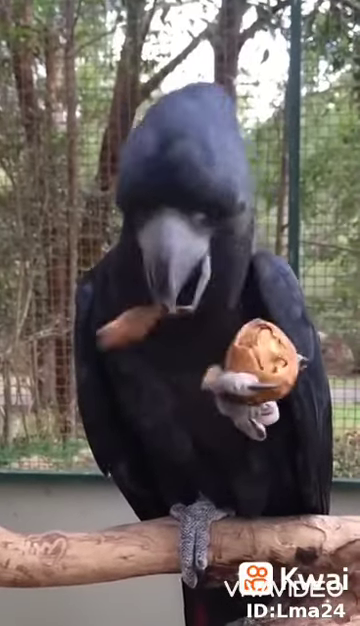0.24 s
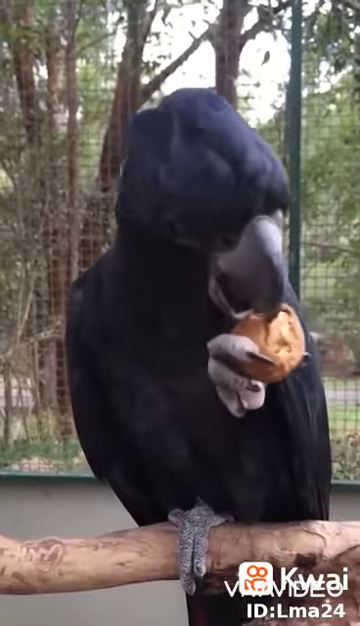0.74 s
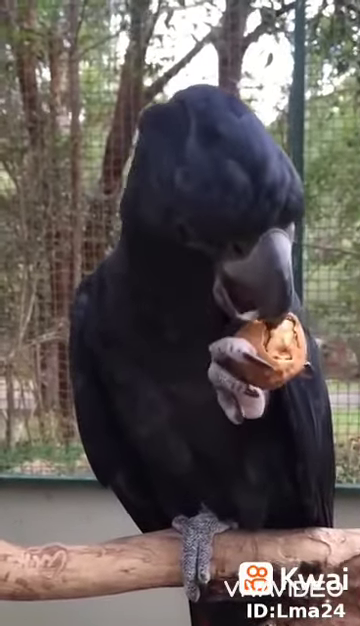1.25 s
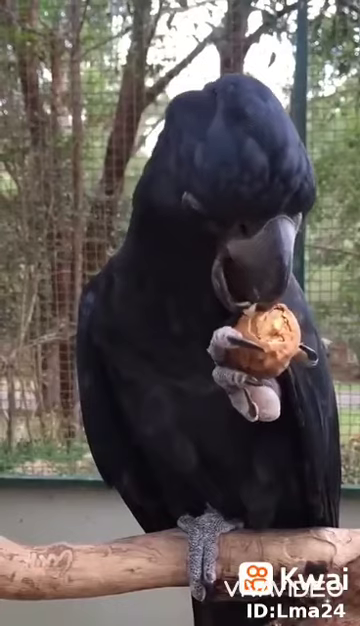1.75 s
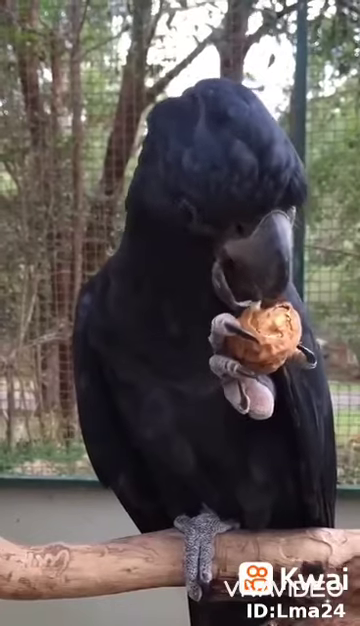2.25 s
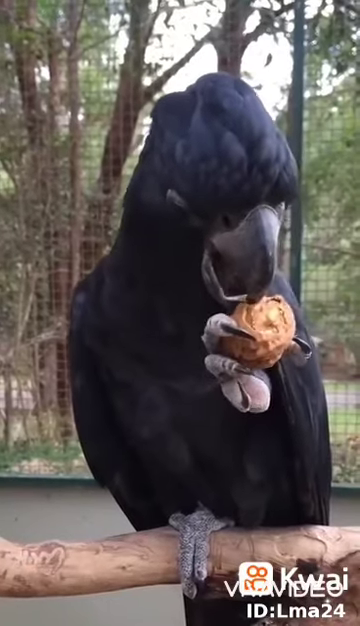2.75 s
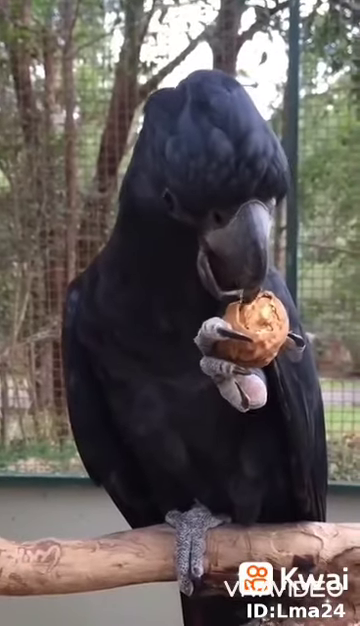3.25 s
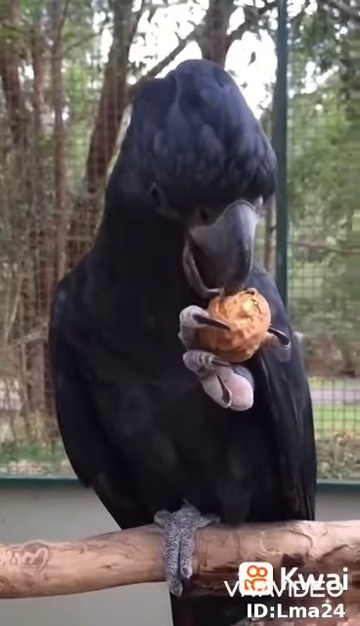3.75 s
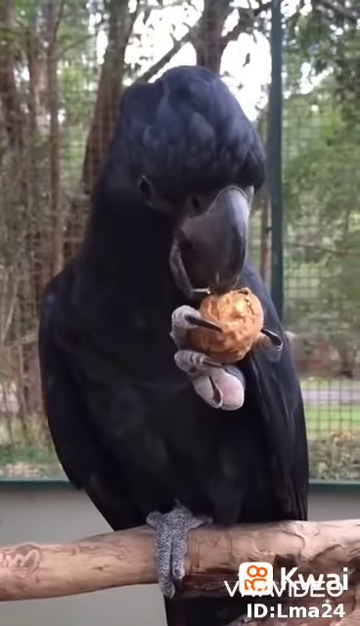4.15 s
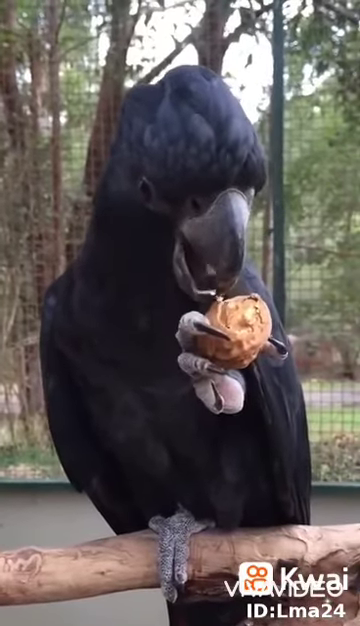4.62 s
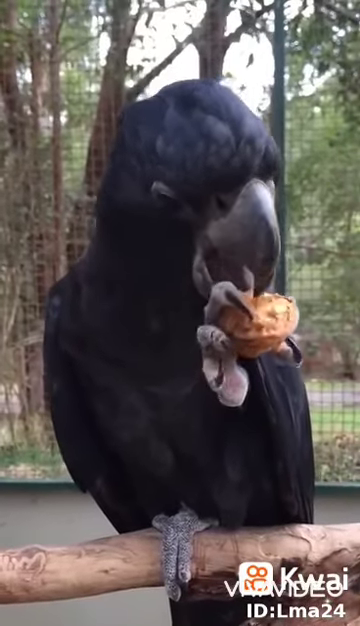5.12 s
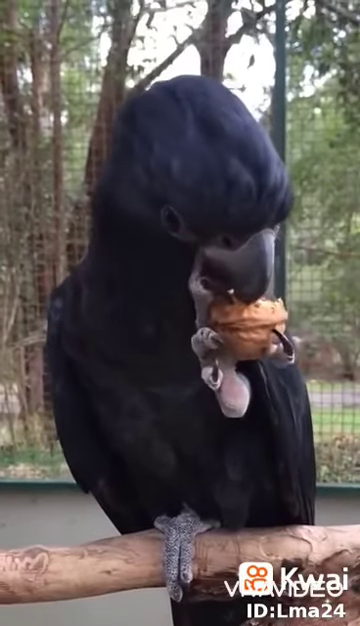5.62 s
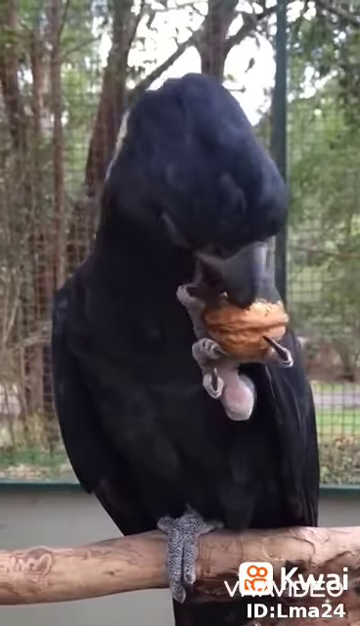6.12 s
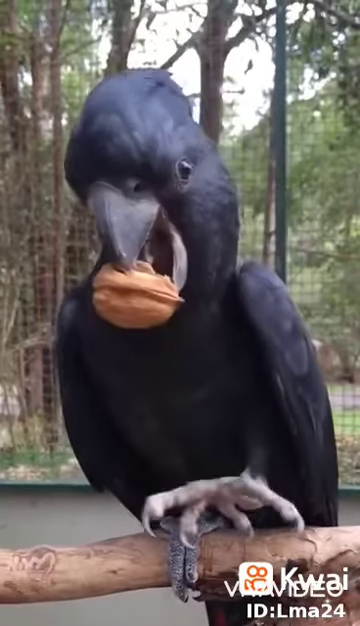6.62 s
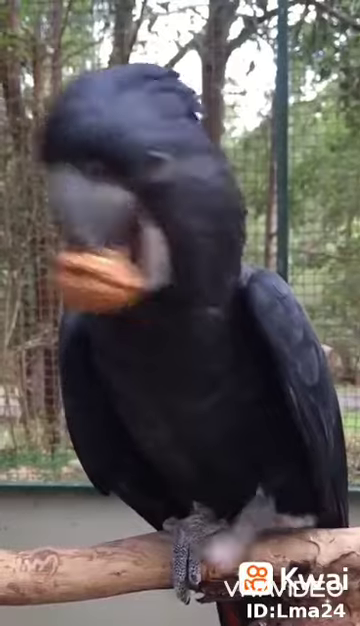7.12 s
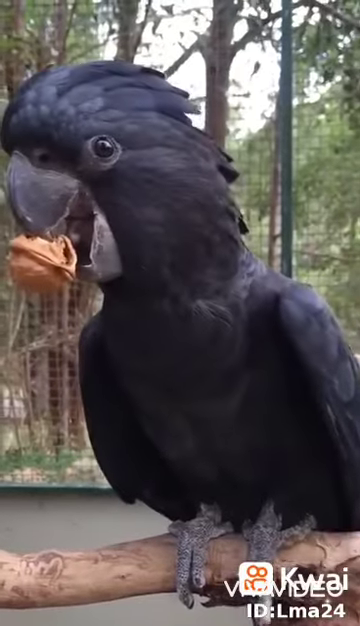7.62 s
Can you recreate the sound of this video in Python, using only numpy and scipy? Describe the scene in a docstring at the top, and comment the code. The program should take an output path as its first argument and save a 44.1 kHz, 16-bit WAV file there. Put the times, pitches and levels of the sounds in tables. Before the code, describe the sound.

Close dry crunching of a nutshell in a parrot's beak, building to loud cracks, with small chirps and hoarse far parrot calls in an outdoor aviary.

```python
"""A large parrot close by cracks and nibbles a walnut shell in an outdoor aviary: noise bursts strike modes.
Other parrots squawk and whistle farther off among trees, as partials that blur into hoarse bands.
A small bird repeats a rising chirp and another gives three pips, all swept sines.
An insect trills faintly, a throbbing narrow noise.
Far rumble and a bright treble hiss, made of filtered noise, lie under it all."""
import sys
import numpy as np
from scipy import signal
from scipy.io import wavfile

SR = 44100
rng = np.random.default_rng(int(sys.argv[2]) if len(sys.argv) > 2 else 0)


def output_pcm(signal):
    """Save a mono or channel-first signal as 16-bit PCM at the path in sys.argv[1].

    Samples are clipped to [-1, 1] before scaling.
    """
    pcm = np.clip(np.atleast_2d(signal).T, -1, 1) * 32767
    wavfile.write(sys.argv[1], SR, np.round(pcm).astype(np.int16))


def natural_amplitude(level_db):
    """Convert a level in decibels to a linear amplitude factor, elementwise."""
    exponent = np.asarray(level_db, float) / 20
    return 10 ** exponent


N = 347049


def rms_one(x):
    """Scale to rms 1."""
    return x / np.sqrt(np.mean(x ** 2) + 1e-20)


def noise():
    """White noise as long as the scene."""
    return rng.standard_normal(N)


def band(x, low_hz, high_hz):
    """Butterworth band-pass."""
    return signal.sosfilt(signal.butter(2, [low_hz, high_hz], "band", fs=SR, output="sos"), x)


def drift(rate_hz, count):
    """Slow random wavering: noise through a two-pole low-pass at the given rate, rms 1."""
    r = np.exp(-2 * np.pi * rate_hz / SR)
    run_in = int(2 * SR / max(rate_hz, 1))
    slow = signal.lfilter([1], [1, -2 * r, r * r], rng.standard_normal(count + run_in))
    return rms_one(slow[run_in:])


def ring(x, hz, t60):
    """One decaying mode: a resonator that loses 60 dB in t60 seconds."""
    r = natural_amplitude(-60 / (t60 * SR))
    w = 2 * np.pi * hz / SR
    return signal.lfilter([0, np.sin(w)], [1, -2 * r * np.cos(w), r * r], x)


def level(rows):
    """Gain along rows of time in seconds and level in dB, silent outside them."""
    s, db = np.transpose(rows)
    return natural_amplitude(np.interp(np.arange(N) / SR, s, db, left=-200, right=-200))


def strokes(rows, attack, release, edge_db):
    """Gain of events (start s, length s, dB): rise, hold and fall, as shares of the length."""
    gain = 0
    for s, n, db in rows:
        gain = gain + level([(s, db + edge_db), (s + attack * n, db),
                             (s + (1 - release) * n, db), (s + n, db + edge_db)])
    return gain


def scatter(x, t60, delay_s, cut_hz):
    """Dense scattered echoes: noise that dies away, dulled; energy 1."""
    t = np.arange(int(t60 * SR)) / SR
    tail = rng.standard_normal(len(t)) * natural_amplitude(-60 * t / t60) * (t > delay_s)
    tail = signal.lfilter([1], [1, -np.exp(-2 * np.pi * cut_hz / SR)], tail)
    return signal.fftconvolve(x, tail / np.sqrt(np.sum(tail ** 2)))[:N]


# Tone color of the outdoor air and far rumble. Each row: frequency in Hz, relative level in dB per Hz.
AIR_SPECTRUM = [(15, -40), (25, -17.5), (45, -6), (65, -2), (90, -8.5), (124, -6), (160, -4.5), (300, -9.5),
                (457, -16.5), (1490, -21), (2100, -21), (3440, -23.5), (4090, -24), (9000, -30)]


def air():
    """Half-octave bands of noise, each wavering a little, sum to the far rumble and air."""
    out = 0
    edges = 22 * 2 ** np.arange(0, 8.8, .5)
    white = rng.standard_normal((2, N))
    hz, db = np.transpose(AIR_SPECTRUM)
    for k, (low, high) in enumerate(zip(edges, edges[1:])):
        here_db = np.interp(np.log(low * high) / 2, np.log(hz), db)
        # a 4 Hz wavering, drawn at every 64th sample
        waver = np.repeat(drift(4 * 64, N // 64 + 1), 64)[:N]
        out = out + natural_amplitude(here_db + 2.0 * waver) * band(white[k % 2], low, high)
    # the level is set by the part from 30 to 400 Hz
    return natural_amplitude(-69 + 0.12 * drift(.6, N)) * out / np.std(band(out, 30, 400))


# The two low drones in the rumble. Each row: pitch in Hz, width in Hz.
DRONES = [(64, 9), (122, 10.18)]
# How the drones waver. Each row: time in seconds, level of the low drone in dB, of the high drone in dB.
DRONE_LEVELS = [(0.0, -121, -72), (1.0, -73, -76), (1.9, -67.5, -77), (2.5, -70, -74), (4.4, -69.5, -75),
                (5.3, -74, -74), (5.802, -73.5, -69), (6.8, -70.5, -75.5), (7.2, -81, -75),
                (7.87, -84, -71)]


def drones():
    """Two narrow bands of noise hum low down, each following its own level."""
    out = 0
    s, *levels_db = np.transpose(DRONE_LEVELS)
    for (hz, width_hz), db in zip(DRONES, levels_db):
        hum = rms_one(band(noise(), hz - width_hz / 2, hz + width_hz / 2))
        out = out + level(np.transpose([s, db])) * hum
    return out


# Level of the bright treble hiss. Each row: time in seconds, level in dB before the random flutter.
TREBLE_HISS = [(0.0, -79.5), (2.69, -81), (2.94, -87.5), (3.18, -80.5), (5.15, -81), (5.87, -74.5),
               (6.14, -71.5), (6.64, -83), (7.87, -83.5)]


def treble_hiss():
    """Bright treble hiss whose level changes slowly, fluttering."""
    bright = rms_one(band(noise(), 8300, 14000))
    return level(TREBLE_HISS) * bright * natural_amplitude(1.6 * drift(3.1, N))


# The dull swell. Each row: start in seconds, length in seconds, level in dB before the random flutter.
DULL_SWELL = [(2.75, 2.28, -69.5)]


def dull_swell():
    """A dull hollow band of noise that swells and passes once."""
    dull = rms_one(band(noise(), 534, 1350)) * natural_amplitude(2.4 * drift(12.2, N))
    return strokes(DULL_SWELL, attack=0.11, release=0.48, edge_db=-18.5) * dull


# The insect's trills. Each row: start in seconds, length in seconds, level in dB.
TRILLS = [(.28, 0.12, -81), (1.78, 0.1, -83), (2.33, 0.26, -83), (3.88, 0.19, -84), (6.69, 0.21, -79.5),
          (7.4, 0.28, -80.5)]


def insect():
    """A narrow rasp of noise that throbs about 31 times a second."""
    throb = (1 + np.sin(2 * np.pi * 31 * np.arange(N) / SR + 1.2 * drift(2.0, N))) ** 2
    rasp = band(noise(), 4390 - 110, 4390 + 110)
    return strokes(TRILLS, attack=.25, release=.3, edge_db=-5) * rms_one(throb * rasp)


def rising_note(db, length_s, start_hz, end_hz, bend):
    """A thin sine sweeps up, broken up on its way through the leaves; bend over 1 speeds up the end."""
    u = np.arange(round(length_s * SR)) / (length_s * SR)
    phase = 2 * np.pi * np.cumsum(start_hz + (end_hz - start_hz) * u ** bend) / SR
    flicker_db = 4.2 * drift(90, len(u))
    return np.sqrt(2) * natural_amplitude(db + flicker_db) * np.sin(np.pi * u) ** 0.61 * np.sin(phase)


# Rising chirps of the small bird. Each row: start in seconds, level in dB, length in seconds.
RISING_CHIRPS = [(2.125, -68, 0.059), (2.345, -74, 0.097), (2.591, -70, 0.048), (3.302, -61.5, 0.044),
                 (3.517, -62, 0.072), (3.739, -61.5, .084), (3.983, -61.5, 0.071), (4.229, -64, 0.056),
                 (4.45, -62.5, 0.093), (4.704, -66, 0.051), (4.942, -62, 0.068), (5.219, -62, 0.049),
                 (5.424, -61.5, .07)]
# Three short rising pips of another small bird. Each row: start in seconds, level in dB.
SHORT_PIPS = [(7.3, -73), (7.438, -69.5), (7.604, -68.5)]


def small_birds():
    """One bird's chirps sweep faster toward their end; another bird's pips sweep evenly."""
    out = np.zeros(N)
    notes = [(s, db, length_s, 1960, 2670, 2.2) for s, db, length_s in RISING_CHIRPS]
    notes += [(s, db, 0.042, 1500, 2300, 1) for s, db in SHORT_PIPS]
    for s, *shape in notes:
        note = rising_note(*shape)
        at = round(s * SR)
        out[at:at + len(note)] += note
    return out


def hoarse(width_hz, count):
    """Complex noise that spreads a tone into a band of about twice this width; power 1."""
    return (drift(width_hz, count) + 1j * drift(width_hz, count)) / np.sqrt(2)


def voice(rows, partials_db, attack_s, hold, release_db, scoop, scoop_s, sag, break_db=0, wander=.005):
    """Calls whose pitch scoops up and sags; roughness turns clear partials into hoarse bands and rasp."""
    onset_db, break_s = -10, 0.016  # a call starts faint; with break_db it falters briefly
    hoarser_per_db = .007  # a call roughens as the effort drops
    out = np.zeros(N)
    for s, length_s, base_db, top_hz, rough in rows:
        at = np.arange(round(s * SR), min(N, round((s + length_s) * SR)))
        count = len(at)
        t = at / SR - s
        corners_s = [0, attack_s, max(hold * length_s, attack_s), length_s]
        effort_db = np.interp(t, corners_s, [onset_db, 0, 0, release_db])
        falter_db = break_db * np.exp(-((t - attack_s - 2 * break_s) / break_s) ** 2)
        db = base_db + effort_db + falter_db
        hz = top_hz * (1 - scoop * np.exp(-(t / scoop_s) ** 2) - sag * (t / length_s) ** 2)
        rough = np.clip(rough - hoarser_per_db * effort_db, 0, 1)
        phase = 2 * np.pi * np.cumsum(hz * (1 + wander * drift(12, count))) / SR
        # the voice rattles: uneven pulses some seventy times a second
        rattle_phase = 2 * np.pi * np.cumsum(72 + 25 * drift(20, count)) / SR
        rattle = 1 + .8 * rough * np.sin(rattle_phase)
        for k, partial_db in enumerate(partials_db, 1):
            partial_hz = hz.mean() * k
            clear = (1 - rough) ** (1 + partial_hz / 1500)  # high partials break up first
            blur = hoarse(partial_hz / 13, count) + .6 * rough ** 2 * hoarse(600, count)
            tone = (np.sqrt(clear) + np.sqrt(1 - clear) * blur) * np.exp(1j * k * phase)
            gain = np.sqrt(2) * natural_amplitude(db + partial_db + 3.1 * drift(9, count))
            out[at] += gain * rattle * tone.real
    return out


# Far squawks. Each row: start in seconds, length in seconds, base level in dB,
# pitch in Hz before scoop and sag, roughness from 0 to 1 at full effort.
SQUAWK_CALLS = [(4.385, 0.58, -57, 965, 0.19), (5.43, .55, -57.5, 965.5, 0.2)]


def squawks():
    """Long, fairly low calls with six partials, strongest in the second and third."""
    return voice(SQUAWK_CALLS, [-17, -0.5, -2.5, -12, -13, -19.5], attack_s=0.11, hold=.55,
                 release_db=-24, scoop=.03, scoop_s=.1, sag=.01, wander=.012)


# A far screech. Each row: start in seconds, length in seconds, base level in dB,
# pitch in Hz before scoop and sag, roughness from 0 to 1 at full effort.
SCREECH_CALLS = [(6.18, .38, -50, 1207, .22)]


def screeches():
    """A wavering call whose second partial stands out, with a deep scoop."""
    return voice(SCREECH_CALLS, [-15.5, 3.0, -8.5, -15, -11, -24.5], attack_s=0.073, hold=0.44,
                 release_db=-35.5, scoop=0.12, scoop_s=0.11, sag=0.025, wander=0.022)


# A far squeal. Each row: start in seconds, length in seconds, base level in dB,
# pitch in Hz before scoop and sag, roughness from 0 to 1 at full effort.
SQUEAL_CALLS = [(.72, 0.18, -61.5, 1553, 0.24)]


def squeals():
    """A call held nearly to its end, led by its first partial."""
    return voice(SQUEAL_CALLS, [1.0, -12.5, -9.0, -7.0], attack_s=0.019, hold=0.85,
                 release_db=-22, scoop=0.019, scoop_s=0.063, sag=0.0043)


# Far yelps. Each row: start in seconds, length in seconds, base level in dB,
# pitch in Hz before scoop and sag, roughness from 0 to 1 at full effort.
YELP_CALLS = [(.85, .19, -62, 1316, 0.17), (2.99, 0.17, -63.5, 1353, 0.06)]


def yelps():
    """Short calls that fade early while their pitch falls."""
    return voice(YELP_CALLS, [-4, 2, -11, -10], attack_s=0.031, hold=0.2,
                 release_db=-11, scoop=0.0083, scoop_s=0.025, sag=0.14)


# A far shriek. Each row: start in seconds, length in seconds, base level in dB,
# pitch in Hz before scoop and sag, roughness from 0 to 1 at full effort.
SHRIEK_CALLS = [(2.853, 0.192, -55.5, 2324, .03)]


def shrieks():
    """A clear high call with two strong partials and a faint third."""
    return voice(SHRIEK_CALLS, [0, -4.8, -28], attack_s=0.034, hold=0.82,
                 release_db=-11, scoop=0.09, scoop_s=.045, sag=0.0204)


# Rough tails and blurred upper partials of the far calls. Each row: start in seconds, length in seconds,
# base level in dB, pitch in Hz before scoop and sag, roughness from 0 to 1 at full effort.
HOARSE_BANDS = [(3.0, 0.28, -61.5, 3850, 0.37), (3.01, 0.19, -64, 2280, 0.45), (3.1, 0.24, -63, 5780, 0.28),
                (4.4, 0.44, -66, 2680, 0.44), (5.5, .32, -58.5, 2760, 0.46), (6.2, 0.21, -64, 5740, 0.44)]


def hoarse_bands():
    """Hoarse bands: rough tails and blurred upper partials of the far calls, each a single partial."""
    return voice(HOARSE_BANDS, [0], attack_s=0.062, hold=0.42,
                 release_db=-10, scoop=0.024, scoop_s=0.092, sag=0.0045)


# Far whistles. Each row: start in seconds, length in seconds, base level in dB,
# pitch in Hz before scoop and sag, roughness from 0 to 1 at full effort.
WHISTLE_CALLS = [(5.97, 0.15, -54, 3070, 0.3), (6.36, 0.19, -58, 3073, .1), (6.745, .16, -54, 3054, 0.052),
                 (7.16, 0.18, -56.5, 3094, .1), (7.605, 0.16, -56.5, 3078, 0.056)]


def whistles():
    """A single partial that starts fast, falters briefly and falls in pitch."""
    return voice(WHISTLE_CALLS, [0], attack_s=0.0092, hold=0.47,
                 release_db=-17.5, scoop=0.087, scoop_s=.035, sag=.1, break_db=-6.5)


# A far yip. Each row: start in seconds, length in seconds, base level in dB,
# pitch in Hz before scoop and sag, roughness from 0 to 1 at full effort.
YIP_CALLS = [(7.13, 0.13, -62.5, 3670, 0.29)]


def yips():
    """A short single partial that scoops up quickly and dies away early."""
    return voice(YIP_CALLS, [0], attack_s=0.0081, hold=0.13,
                 release_db=-17, scoop=0.15, scoop_s=.022, sag=0.072)


# Soft far notes, low or high. Each row: start in seconds, length in seconds, base level in dB,
# pitch in Hz before scoop and sag, roughness from 0 to 1 at full effort.
STEADY_NOTES = [(2.8, 0.057, -67.5, 634, 0.056), (3.46, 0.33, -74, 643, .05), (5.08, 0.26, -71, 2300, 0.2)]


def steady_notes():
    """Soft far notes, low or high, single partials almost steady in pitch."""
    return voice(STEADY_NOTES, [0], attack_s=0.053, hold=0.44,
                 release_db=-8, scoop=.012, scoop_s=0.031, sag=0.0017)


def far_calls():
    """All the far voices together."""
    return (squawks() + screeches() + squeals() + yelps() + shrieks()
            + hoarse_bands() + whistles() + yips() + steady_notes())


# Hard echoes from sheds nearby. Each row: delay in seconds, level in dB against the direct call.
SHED_ECHOES = [(.037, -9), (.083, -12), (.14, -14)]


def slaps(x):
    """A few separate echoes lay a gliding call over itself."""
    return sum(natural_amplitude(db) * np.pad(x, (round(delay_s * SR), 0))[:N] for delay_s, db in SHED_ECHOES)


# Low thumps. Each row: time in seconds, strength of the starting click in dB.
LOW_THUMPS = [(.259, -50), (2.54, -44), (5.7873, -36.5), (6.149, -26)]


def thumps():
    """A few breaks come with a low thump: a click rings two low modes."""
    clicks = np.zeros(N) + 1e-18
    for s, db in LOW_THUMPS:
        clicks[round(s * SR)] = natural_amplitude(db)
    return band(ring(clicks, 98, .03) + ring(clicks, 271.6, 0.022), 67, 1000)


def nut(burst, modes, bite_hz, grip=0.02):
    """A burst strikes every mode, most those near the bitten spot's pitch; the grip shifts the pitches."""
    out = 0
    for (hz, db, t60), (a, b) in zip(modes, rng.standard_normal((len(modes), 2))):
        near_db = 12 * np.exp(-(np.log(hz / bite_hz) / .11) ** 2)
        out = out + natural_amplitude(db + near_db + 2.5 * a) * ring(burst, hz * (1 + grip * b), t60)
    return band(out, modes[0][0], 1.05 * modes[-1][0])


# Crumbs grinding under the beak. Each row: start in seconds, length in seconds,
# level in dB of the bright grains, to which the ringing of the shell is added.
GRINDING_STROKES = [(.15, .17, -73.5), (.55, 0.078, -75), (.7, 0.066, -72.5), (1.02, 0.16, -65.5),
                    (1.22, 0.056, -72.5), (1.47, 0.17, -68.5), (1.6, 0.092, -69), (2.5, 0.13, -71),
                    (3.76, 0.089, -74), (5.15, 0.33, -73), (5.58, 0.29, -62), (5.96, .3, -65),
                    (6.28, 0.13, -76)]
# Ringing of the shell, also used by the cracks.
# Each row: pitch in Hz, relative level in dB, seconds to die away by 60 dB.
SHELL_MODES = [(1950, -14.5, 0.022), (2260, 17, 0.0053), (3090, -24, 0.021)]
# Ringing of the splinters, also used by the cracks.
# Each row: pitch in Hz, relative level in dB, seconds to die away by 60 dB.
SPLINTER_MODES = [(3800, -0.5, 0.0043), (4230, -1.5, 0.0046), (5830, 3, 0.0016), (6570, -9, 0.0044),
                  (7400, -3, 0.0027)]


def grinding():
    """Dense uneven grains, clumped, bright, with some ringing of the shell and splinters."""
    born = rng.random(N) < 2500 * natural_amplitude(5.0 * drift(25, N)) / SR
    size = natural_amplitude(2.9 * np.minimum(rng.exponential(1, N), 4))
    grains = born * size * rng.choice([-1, 1], N) + 1e-18
    shell = natural_amplitude(-5.0) * rms_one(nut(grains, SHELL_MODES, 2250))
    splinters = natural_amplitude(-0.5) * rms_one(nut(grains, SPLINTER_MODES, 5600))
    bright = rms_one(band(grains, 8900, 14400))
    gain = strokes(GRINDING_STROKES, attack=.4, release=0.26, edge_db=-4.5)
    return gain * (bright + shell + splinters)


# Beak on shell. Each row: time of the break in seconds, hollow knock in dB, shell ring in dB,
# bright snap in dB, pitch of the bitten spot in Hz.
BREAKS = [(0.1617, -52, -51, -66, 2440), (0.176, -49.5, -45.5, -63, 2260), (0.253, -53, -58, -57, 3790),
          (0.2607, -50, -61, -57, 3810), (0.279, -76, -60, -56, 6400), (0.5807, -61.5, -48.5, -46, 5300),
          (0.5872, -63, -43.5, -36, 5530), (0.7274, -46, -46, -51, 2240), (0.8152, -51, -65, -80, 6050),
          (0.8712, -50.5, -48, -70, 2070), (1.0174, -62, -45.5, -74, 2220),
          (1.0314, -55.5, -32.5, -61, 2240), (1.0652, -60, -54, -69, 2140),
          (1.0855, -41.5, -35.5, -59, 2170), (1.092, -64, -58, -50, 6660), (1.1157, -44, -41, -30.5, 6400),
          (1.248, -80, -70, -51, 7200), (1.259, -82, -73, -50, 7040), (1.278, -75, -63, -60, 2300),
          (1.369, -62.5, -54.5, -94, 2260), (1.4496, -47, -48, -61.5, 2150),
          (1.4922, -72, -47.5, -44, 7200), (1.5031, -68, -62, -53, 7060), (1.5434, -68, -51, -47.5, 6900),
          (1.5762, -65, -43, -38.5, 6270), (1.6075, -72, -51, -50, 6500), (1.6155, -65, -49, -37.5, 6840),
          (1.6333, -67, -62, -45, 6770), (1.87, -61.5, -67, -87, 2240), (1.9679, -61, -51, -71, 2300),
          (1.9727, -52.5, -50, -41, 7700), (2.527, -64, -65, -57, 7710), (2.537, -52, -56, -51, 7500),
          (2.593, -80, -64, -54, 6720), (3.159, -82, -69, -63, 3970), (3.2404, -57, -67, -72, 5810),
          (3.791, -66, -68, -57, 7430), (3.8524, -51, -48, -33.5, 5860), (5.1746, -50.5, -56.5, -65, 2350),
          (5.2851, -49, -44.5, -77, 2220), (5.3642, -49.5, -54.5, -70, 5560),
          (5.4143, -59.5, -47.5, -54, 2300), (5.584, -58, -59, -39.5, 1890),
          (5.6434, -55, -50.5, -45.5, 5940), (5.6972, -57, -35.5, -24, 3800), (5.719, -68, -48, -34, 3600),
          (5.7307, -73, -53, -49, 5730), (5.7613, -63, -47, -62, 4050), (5.7861, -39, -33, -13, 5140),
          (5.7919, -74, -40.5, -20, 3370), (5.9833, -65.5, -52, -46, 6170), (6.0372, -67, -53, -41, 4300),
          (6.094, -71, -28, -23.5, 3430), (6.148, -23, -27, -13, 7300), (6.1524, -65, -70, -23.5, 7970),
          (6.3596, -63, -60, -50, 3730)]
# Hollow knock of the nut. Each row: pitch in Hz, relative level in dB, seconds to die away by 60 dB.
HOLLOW_MODES = [(424, -6.5, 0.0027), (595, 8, 0.0027), (1070, 13, 0.0037), (1500, -4, 0.0058)]


def cracks():
    """Each break is a spray of tiny fractures after a short creak, ringing the nut's modes."""
    length, lead = 4000, 220  # samples in a break, and of creak before it
    out = np.zeros(N + length)
    snap_filter = signal.butter(4, 8900, "high", fs=SR, output="sos")
    ms = (np.arange(length) - lead) * 1000 / SR
    creak = natural_amplitude(-12 + 5.9 * ms)
    decay = natural_amplitude(-8.0 * ms) + natural_amplitude(-24.0 - 0.63 * ms)
    shape = np.where(ms < 0, creak, decay)
    for s, hollow_db, ring_db, snap_db, bite_hz in BREAKS:
        # splinters sound between ring and snap, more where the bitten spot is thin and high
        splinter_db = snap_db + 0.6 * (ring_db - snap_db) - 6 + 7.5 * (bite_hz > 3000)
        burst = rng.standard_normal(length) * natural_amplitude(2.0 * rng.standard_normal(length)) * shape
        parts = [nut(burst, modes, bite_hz) for modes in (HOLLOW_MODES, SHELL_MODES, SPLINTER_MODES)]
        parts.append(signal.sosfilt(snap_filter, burst))
        at = round(s * SR) - lead
        for part, db in zip(parts, (hollow_db, ring_db, splinter_db, snap_db)):
            # each level is the rms over the first three milliseconds of the break
            first_rms = np.sqrt(np.mean(part[lead:lead + 132] ** 2))
            out[at:at + length] += natural_amplitude(db) * part / first_rms
    return out[:N]


def scene():
    """The nut is near and dry, the other birds far and wet."""
    near = cracks() + grinding()
    far = far_calls()
    notes = small_birds()
    cage = natural_amplitude(-18.5) * scatter(near, t60=0.12, delay_s=0.00077, cut_hz=9000)
    far = far + slaps(far)
    trees = scatter(natural_amplitude(-10.5) * far + natural_amplitude(-10) * notes, t60=0.33, delay_s=0.014, cut_hz=9800)
    background = air() + drones() + treble_hiss() + dull_swell() + insect()
    return (background + notes + far + trees + thumps() + near + cage)[None]


def roll_off(x):
    """The treble ends steeply here."""
    return signal.sosfilt(signal.butter(12, 16640, fs=SR, output="sos"), x)


def record(dry):
    """The microphone path rolls off the very top."""
    mix = signal.sosfilt(signal.butter(10, 15400, fs=SR, output="sos"), dry)
    return roll_off(mix)


dry = scene()
out = record(dry)
output_pcm(out)
```